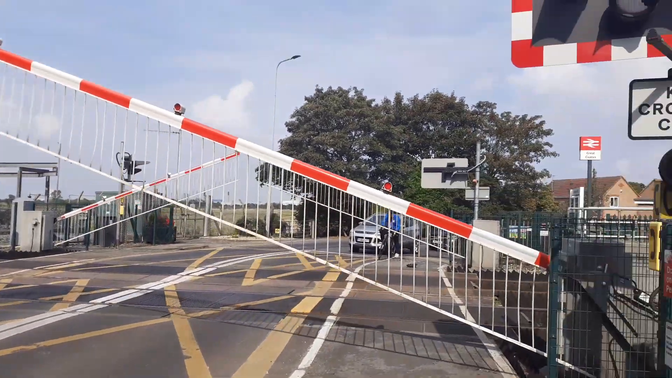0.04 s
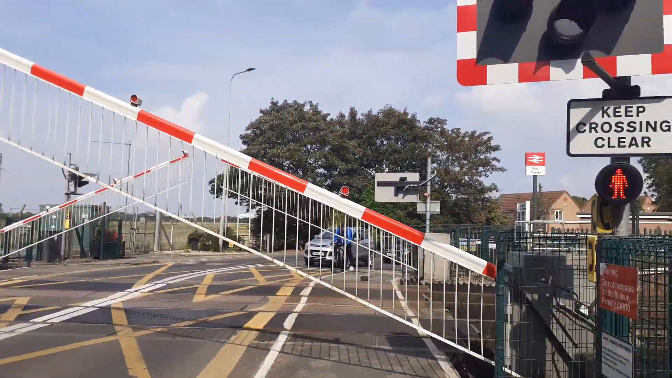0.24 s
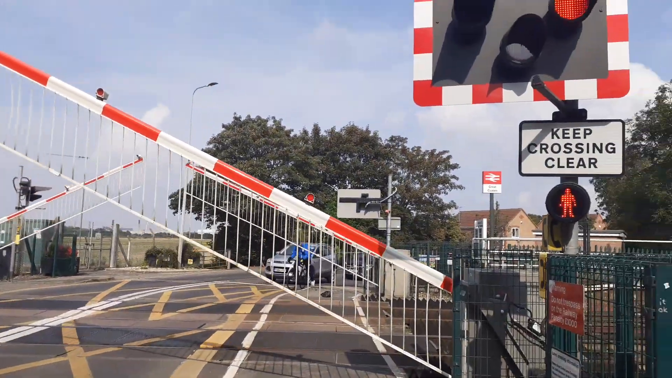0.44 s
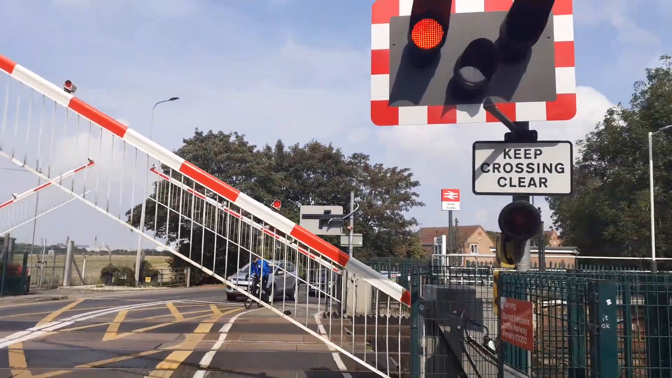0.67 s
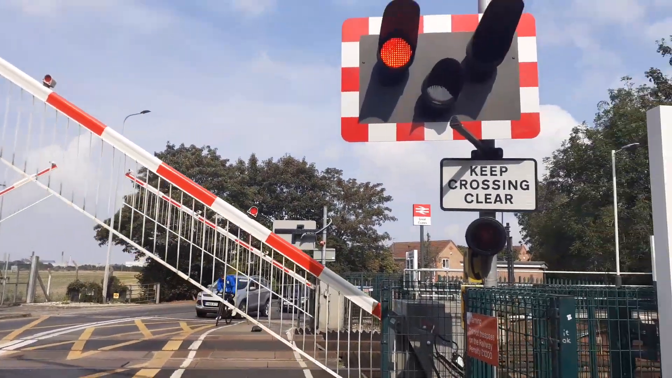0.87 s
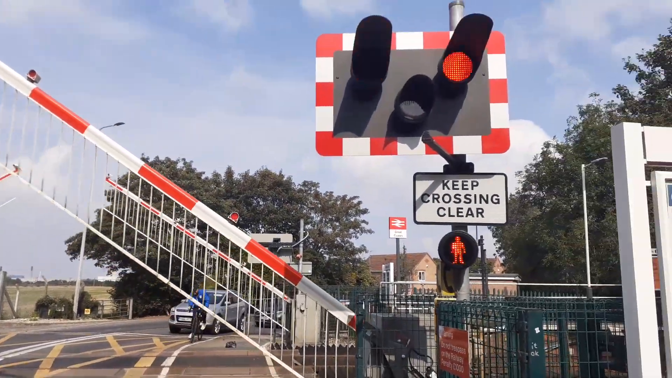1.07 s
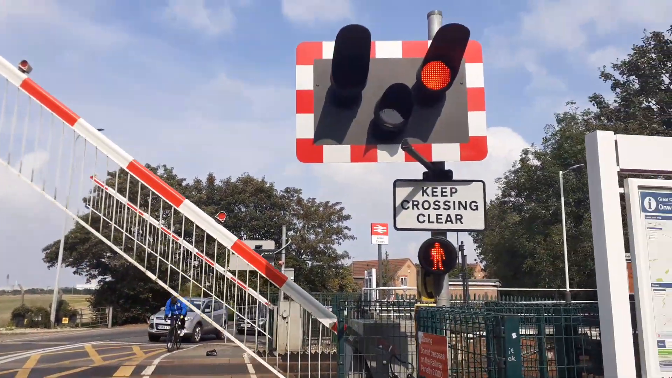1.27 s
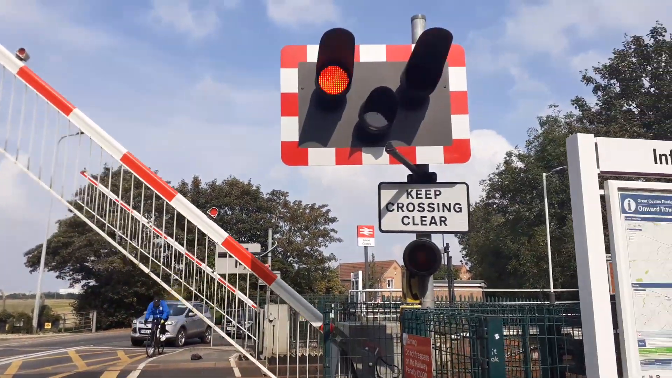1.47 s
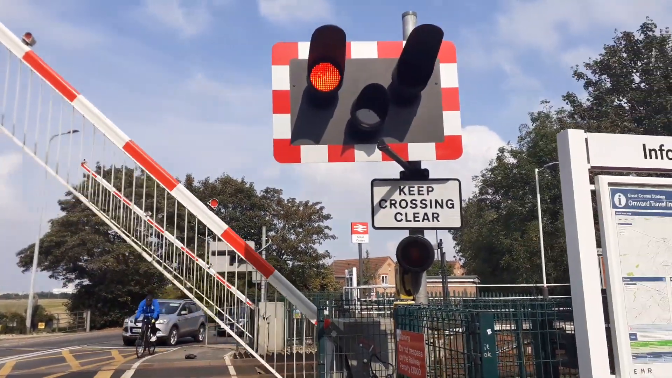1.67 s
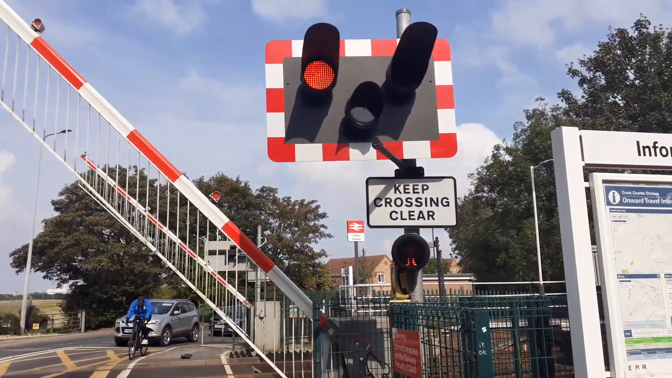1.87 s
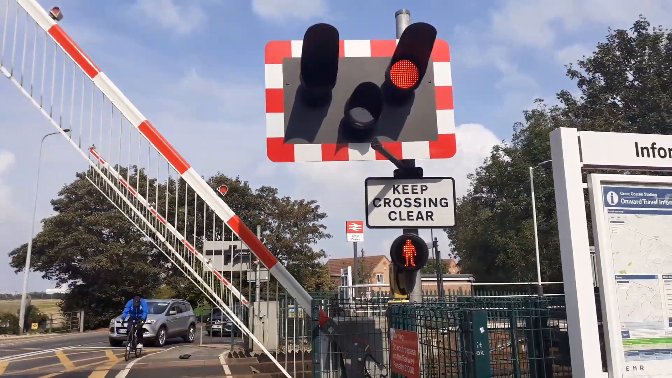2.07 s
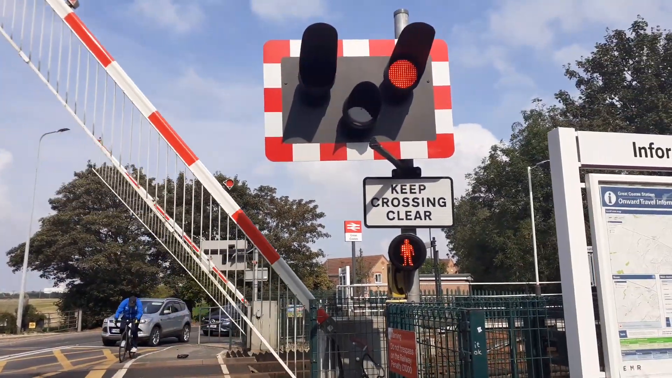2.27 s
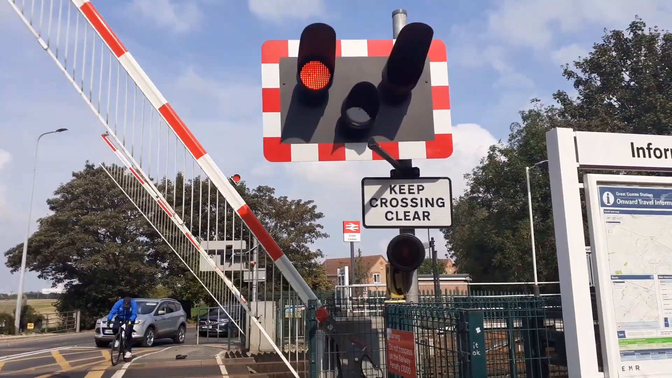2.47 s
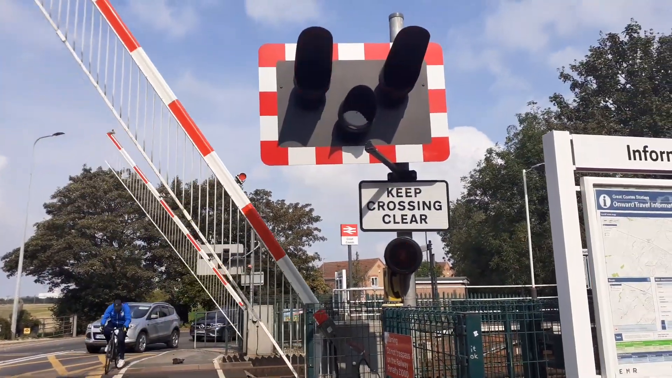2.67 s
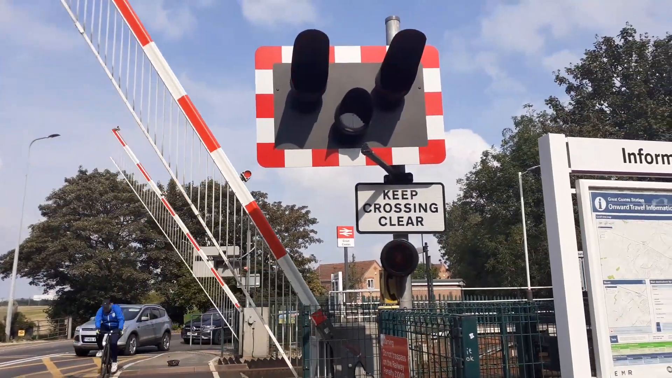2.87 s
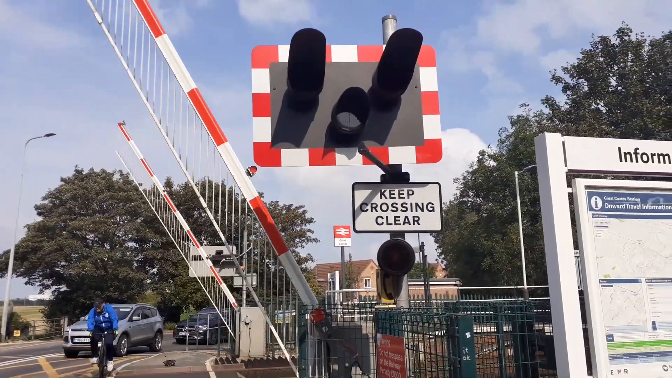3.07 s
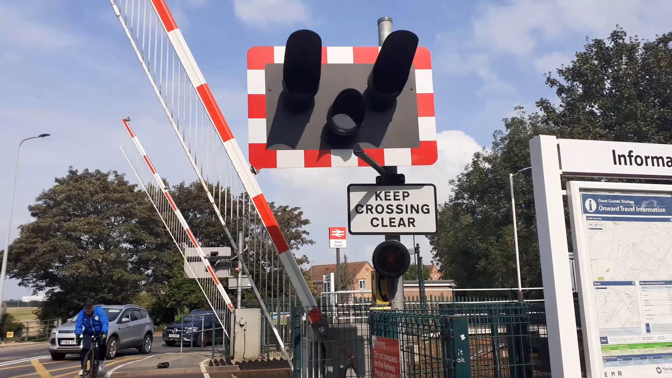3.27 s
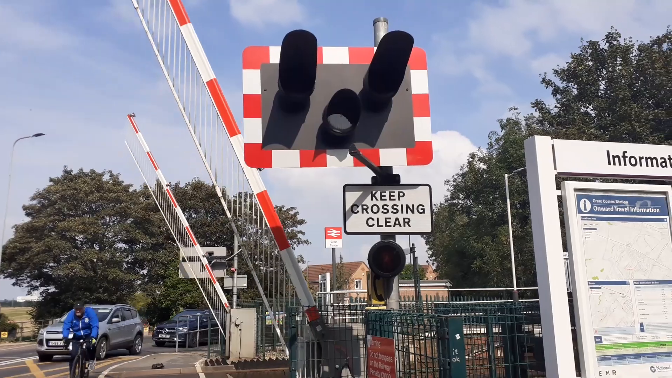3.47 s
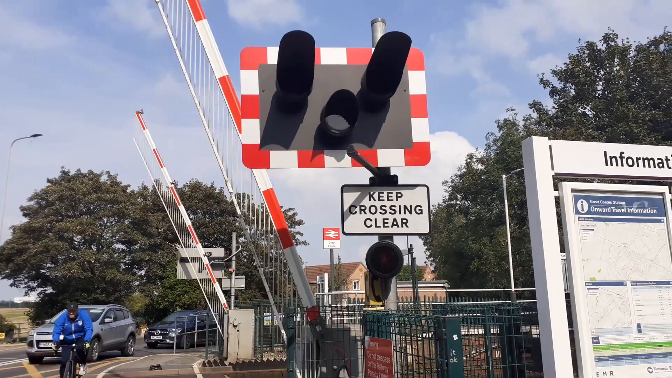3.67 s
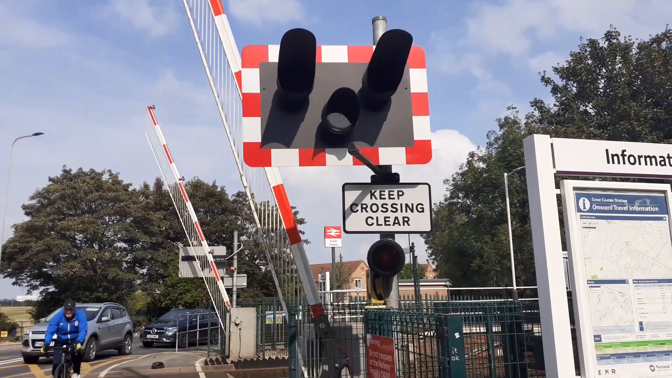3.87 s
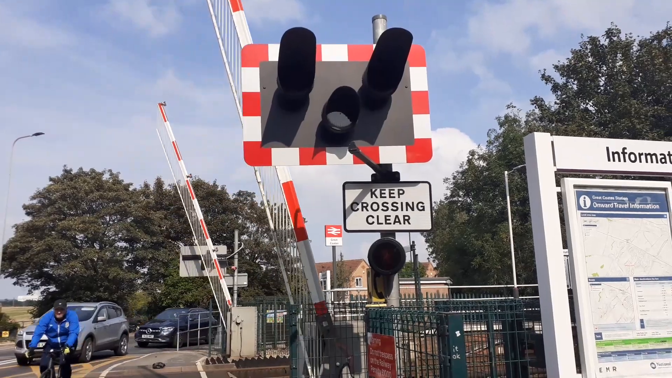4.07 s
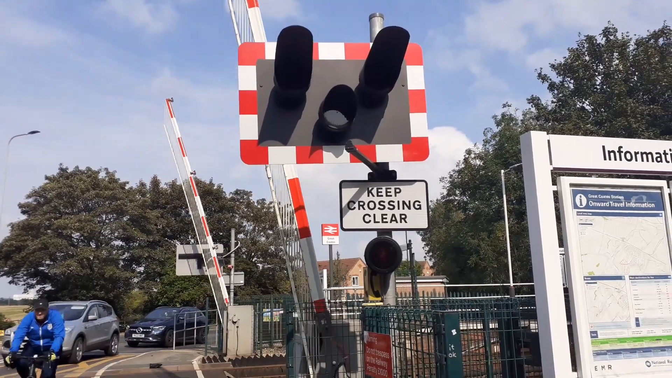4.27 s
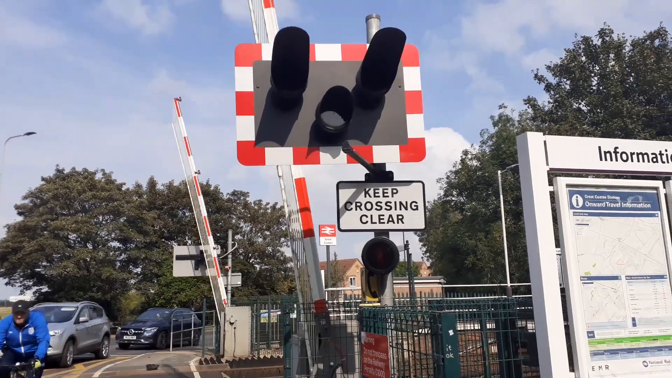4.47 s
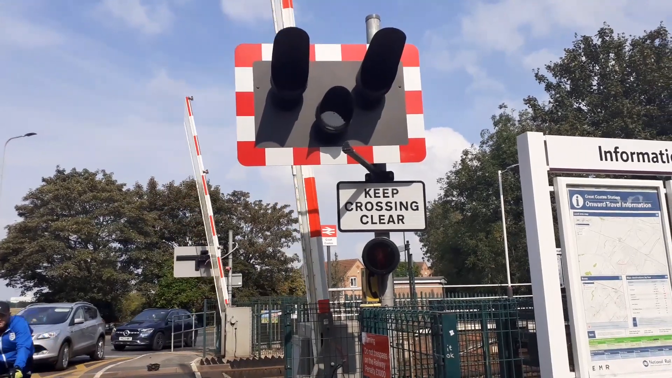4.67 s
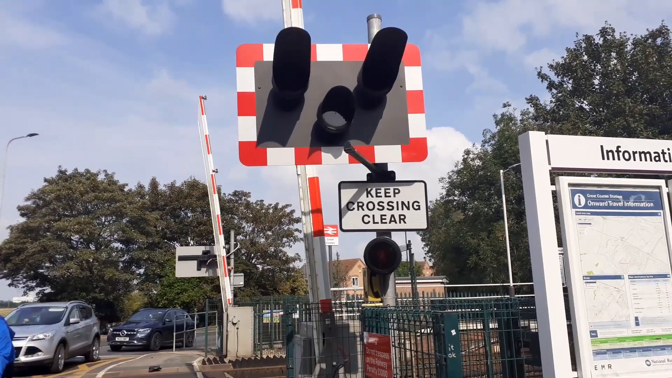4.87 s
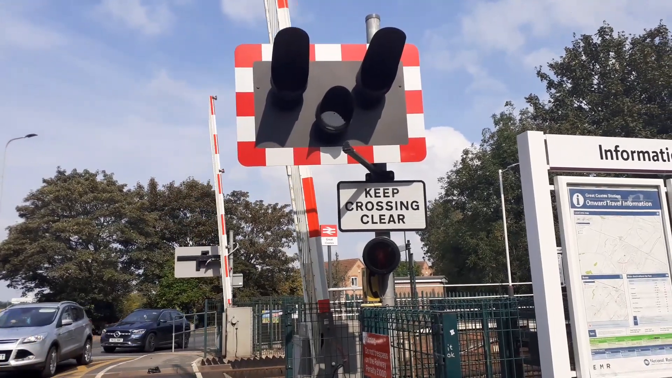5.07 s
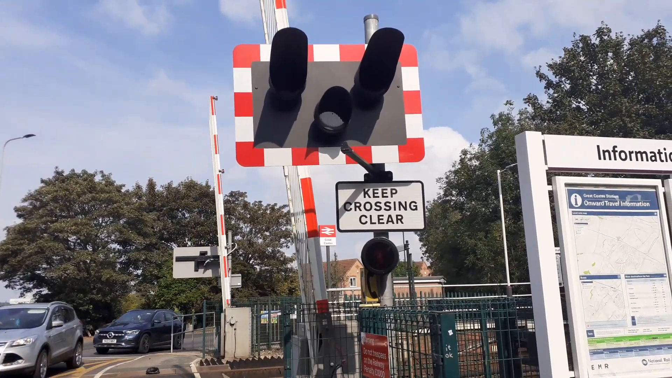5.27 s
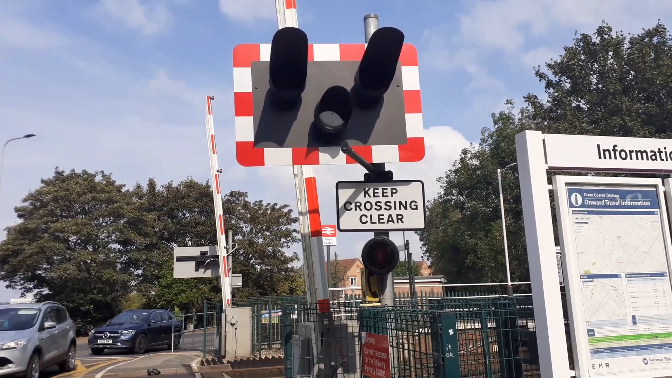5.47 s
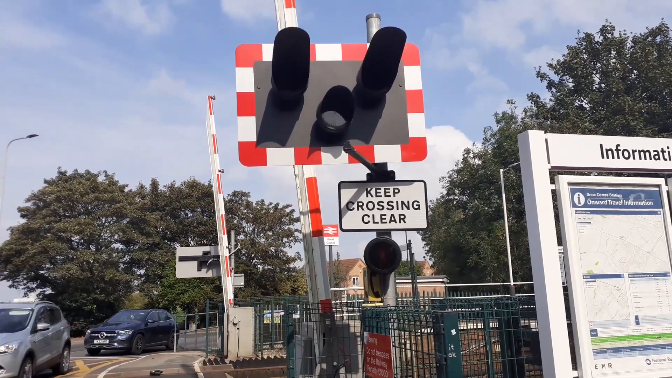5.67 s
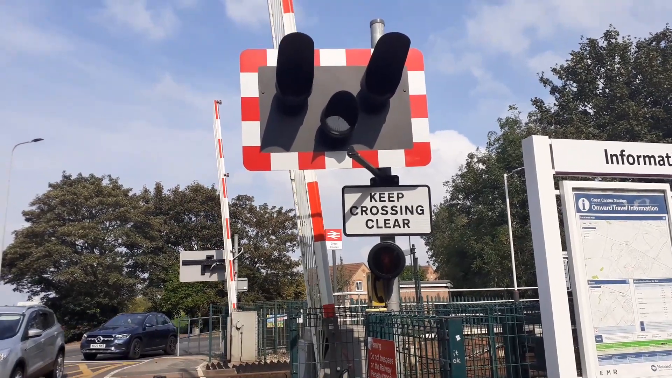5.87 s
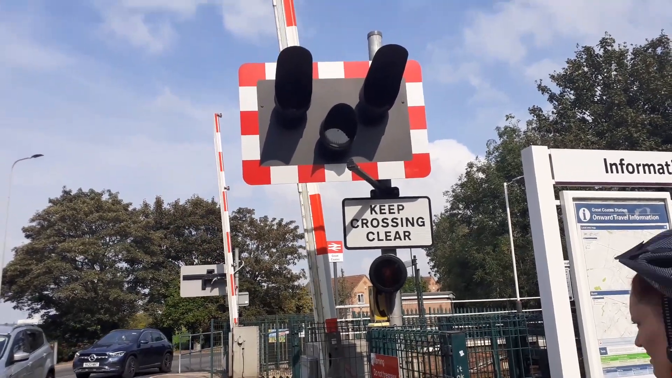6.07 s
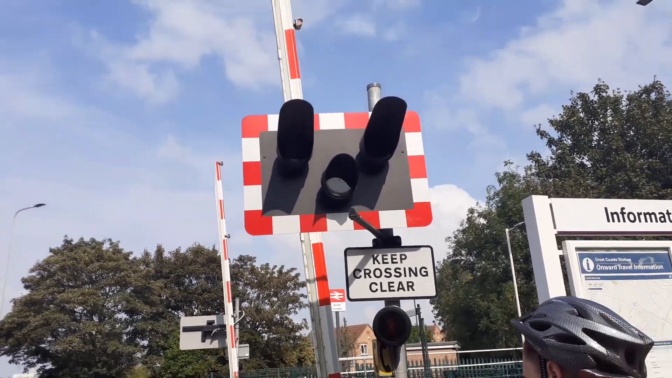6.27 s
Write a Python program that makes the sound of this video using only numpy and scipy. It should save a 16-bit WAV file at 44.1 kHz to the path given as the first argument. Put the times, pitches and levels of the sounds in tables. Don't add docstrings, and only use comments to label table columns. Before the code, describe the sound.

Close outdoors at a level crossing, four slightly out-of-tune barrier pumps hum and beat, sagging gently in pitch. On the left a car pulls away with low engine tones, tyre hiss and faint whirrs, while wind puffs at the stereo microphones. After almost five seconds the hum drops out and coasts down; the boom knocks woodenly, its metal skirt ticks and scrapes, the hollow cabinet drums, and traffic swells nearer.

```python
import sys
import numpy as np
from scipy import signal
from scipy.io import wavfile
from scipy.ndimage import map_coordinates

SR = 44100
rng = np.random.default_rng(int(sys.argv[2]) if len(sys.argv) > 2 else 0)


def boost_factor(decibels):
    exponent = np.asarray(decibels, float) / 20
    return 10 ** exponent


def dump_mix(stems):
    frames = np.atleast_2d(stems).T
    limited = np.clip(frames, -1, 1)
    pcm = np.round(limited * 32767).astype(np.int16)
    wavfile.write(sys.argv[1], SR, pcm)


N = 278752

# (time [s], pitch 1 [Hz], pitch 2 [Hz], pitch of pump 3 [Hz], pitch 4 [Hz])
PUMP_PITCH = [(0.0, 352.55, 345.39, 341.93, 353.4), (0.4, 353.33, 344.88, 338.69, 343.13),
              (0.79, 352.49, 342.86, 337.44, 347.34), (1.18, 351.0, 343.03, 336.22, 345.96),
              (1.58, 349.41, 341.78, 334.51, 341.11), (1.98, 348.42, 340.45, 335.19, 344.85),
              (2.37, 346.2, 339.49, 332.44, 341.56), (2.76, 345.13, 339.58, 331.15, 343.91),
              (3.16, 344.34, 339.99, 331.15, 339.66), (3.56, 341.77, 338.66, 330.7, 342.43),
              (3.95, 342.91, 337.75, 329.49, 342.69), (4.35, 337.07, 337.0, 329.01, 337.95),
              (4.74, 333.03, 335.05, 329.06, 330.45)]
# (time [s], level 1 [dB], level 2 [dB], level 3 [dB], level 4 [dB])
PUMP_LEVEL = [(0.0, -42.3, -21.1, -32.3, -44.2), (0.4, -44.7, -25.9, -36.5, -20.1),
              (0.79, -34.0, -18.2, -29.4, -35.2), (1.18, -34.4, -18.2, -31.9, -54.4),
              (1.58, -30.7, -18.6, -38.3, -16.9), (1.98, -33.7, -22.4, -28.3, -32.8),
              (2.37, -32.8, -19.9, -35.1, -42.1), (2.76, -38.0, -20.4, -31.8, -46.9),
              (3.16, -40.8, -23.8, -36.0, -32.7), (3.56, -32.6, -23.5, -35.6, -30.2),
              (3.95, -25.2, -21.2, -40.8, -25.1), (4.35, -21.2, -16.0, -35.5, -24.6),
              (4.74, -22.3, -21.0, -28.4, -21.1)]
# (time [s], left minus right [dB])
PUMP_SIDE = [
    (0, 1.5),
    (.8, -2.5),
    (2.4, -1),
    (3.2, -3.5),
    (4.7, -1.5),
]
STOP_S = 4.715
CUT_DB, CUT_S = -9.5, 0.026
COAST_DB_PER_S, COAST_HZ_PER_S = -53, -16.5
FOURTH_DB, THIRD_DB, SHAFT_DB_PER_S = -40.5, -45, -1.7

# (time [s], level of its lowest tone [dB])
FAR_LEVEL = [(0, -55), (2.6, -55), (3.05, -40.5), (3.55, -39), (3.75, -50), (4.0, -43), (4.65, -47),
             (4.85, -37), (5.2, -36), (5.33, -33), (5.48, -38.5), (5.55, -39), (5.61, -38), (5.68, -29),
             (5.76, -36), (6.32, -38)]
FAR_HZ, FAR_SAG_HZ_PER_S, FAR_START_S, FAR_UPPER_DB = 382, -1.2, 2.6, -61

# (time [s], firing pitch [Hz], second order [dB], first order [dB], third order [dB])
ENGINE = [(0.0, 56.5, -43, -42, -55), (0.45, 52, -50, -52, -60), (0.6, 53, -35.5, -51, -56),
          (0.75, 57.9, -32.5, -44, -56), (0.92, 64.5, -42, -41, -55), (1.15, 68.5, -52, -58, -58),
          (1.45, 69.82, -51, -41.5, -58), (1.7, 67.01, -53, -54, -58), (1.9, 63.5, -42, -46, -56),
          (2.2, 64.2, -40.5, -42, -55), (2.83, 65.3, -42, -49, -50), (3.05, 58.5, -42, -49, -48),
          (3.5, 59.6, -42, -43, -44), (3.83, 65.5, -40.5, -45, -49), (3.95, 59.9, -59, -49, -51),
          (4.37, 50.6, -42, -43, -56), (4.6, 53.07, -39, -53, -56), (4.8, 45.8, -48, -45, -53),
          (5.37, 54.8, -39.5, -41, -43), (6.2, 57, -40, -39, -47), (6.32, 59.5, -33, -33, -48)]
GEAR_ON_S, GEAR_OFF_S = 0.6, 3.1
GEAR_DB, GEAR_FADE_DB_PER_S, GEAR_IDLE_DB = -53, 45, -70

# (time [s], nearness of traffic [dB], rush of tyres and oil [dB])
ROAD_DRIVE = [(0, 2.5, -9), (.17, 0.5, -7), (.4, 0, -3), (.76, 0.5, 2), (1.14, 0.5, 3), (2.06, -0.5, 1.5),
              (2.82, 0.5, 1.5), (3.61, 0.5, 0), (3.86, 0.5, 2.5), (4.47, 3, -3), (4.75, 6, -4.5),
              (4.91, 3, 0.5), (5.23, 2, 1.5), (5.42, 6.5, -2), (5.86, 7.5, -1.5), (6.18, 11, -4.5),
              (6.32, 11, -4)]
# (frequency [Hz], level per Hz [dB])
ROAD_COLOUR = [(30, -38), (50, -12.5), (110, -9), (200, -9.5), (300, -1), (450, -9), (600, -11.5),
               (850, -5), (1050, -10.5),
               (1300, -13.5), (2200, -20), (3500, -25), (8000, -33), (10000, -14.5), (13000, -18)]
# (frequency [Hz], share of power [0-1])
FROM_LEFT = [(50, .8), (300, .75), (700, .55), (1300, .45), (3000, .4), (8000, .48), (11000, .24)]
# (time [s], lead of the left microphone [samples], weight of direct share [factor])
BEARING = [
    (0, 24.2, 0.78),
    (.5, 19.9, 1.18),
    (2.5, 19.5, 0.85),
    (3.2, 20.66, 0.85),
    (4, 21, 0.83),
    (4.7, 22, 0.62),
    (5.5, 22.5, 0.73),
    (6.32, 25.3, 0.41),
]
# (level [dB], share of nearness [factor], share of rush [factor])
ROAD_LAYERS = [
    (-41, 1, 0.054),
    (-34.5, 0.55, 0.14),
    (-41.5, 0.84, 0.75),
    (-52.5, .05, 0.88),
]
LEFT_LEAD = 21

DRUM_DB, DRUM_FOLLOWS = -45.5, 1.1
SETTLE_DB, SETTLE_DB_PER_S = -36, -13

# (time [s], length [s], left level [dB], right level [dB], pitch [Hz])
PUFFS = [(0.05, 0.058, -56, -30.5, 84), (0.553, 0.07, -49, -36, 90.7), (0.712, 0.018, -32, -30, 105),
         (0.907, 0.21, -39, -45, 80), (1.88, 0.21, -36.5, -57, 90), (2.183, 0.064, -55, -36.5, 88.1),
         (4.32, 0.027, -61, -25, 107), (4.48, 0.066, -53, -27, 105), (4.63, 0.066, -50, -37, 90.3),
         (5.001, 0.035, -45, -38, 90), (5.604, 0.087, -37, -51, 80.4), (5.9, 0.006, -27, -35, 106),
         (6.197, 0.042, -36, -45.5, 80.1)]

# (loudest time [s], length [s], pitch there [Hz], level [dB],
# sag in pitch [share per s])
WHIRRS = [(1.5, .45, 770, -43.5, .02), (2.7, .6, 850, -46, .0), (.9, .35, 1960, -48, 0.),
          (2.1, .45, 1960, -50, .02), (1.6, .5, 2400, -52, .03), (2.9, .5, 2150, -53, -.03),
          (3.9, .35, 2230, -50, 0.), (1.2, .45, 4250, -57, .02), (3.15, .45, 4000, -53, .03),
          (3.65, .2, 3700, -54, .1), (4.35, .3, 3250, -54, .1), (6.15, .3, 1460, -44, 0.),
          (6.15, .25, 520, -42, 0.), (1.6, .7, 6800, -60, .04), (1.0, .4, 8500, -63, 0.),
          (3.3, .8, 8300, -62, .015), (1.5, .5, 13900, -66, -.04), (1.4, .5, 11800, -67, 0.),
          (.6, .35, 3900, -59, 0.)]
WHIRR_WIDTH_HZ, WHIRR_WIDENS = 70, 0.012
# (time [s], pitch [Hz], level [dB])
IDLER = [
    (3.75, 148, -70),
    (3.98, 155, -44),
    (4.45, 156, -42),
    (4.72, 165, -44),
    (5.05, 168, -70),
]

# (time [s], top band peak [dB], high band [dB], mid band [dB])
SLATS = [(4.7185, -25, -2, -5), (4.786, -40, -5, 4), (4.7925, -25, -15, -8), (5.048, -33, -9, -6),
         (5.142, -30.5, -1, -5), (5.152, -28.5, 1, -1), (5.173, -38, -6, -3), (5.1644, -37, -13, -1),
         (5.261, -34, 1, -4), (5.324, -24, -6.5, -7.5), (5.421, -34, -6, 1), (5.442, -35, -1, -7),
         (5.457, -36, -10, 1), (5.589, -32, -3, -9), (5.600, -30, -1, -14), (5.681, -28.5, -4, -12),
         (5.774, -29.5, -5.5, -20), (5.866, -29.5, -3, -3), (5.965, -33.5, 5, 3), (6.047, -36.5, 4, 5),
         (6.0671, -35, -18, -5), (6.08, -35, -14, -7), (6.312, -38, -3, -8)]
# (time [s], top band peak [dB], high band [dB], mid band [dB])
TICKS = [(1.1794, -39, 5, 8), (1.796, -35.5, 4, 6.5), (4.138, -36.5, -4, 8.5), (4.7775, -35, -15, -5),
         (4.916, -41, -18, 14), (4.938, -25.5, -4, -14), (5.0998, -33, -5, 2), (5.18, -36, -1, 0),
         (5.245, -29, -14, -9), (5.365, -39, -11, 1), (5.5, -44, -6, -2), (5.73, -41, 11, -6),
         (5.755, -42, -15, -12), (5.815, -48, -6, 1), (5.841, -42, -7, 8), (5.8934, -40, 8, 14.5),
         (5.907, -38, -6, 0), (6.1469, -36, -14, -11), (6.1705, -41, -16, -12), (6.24, -38, -4, 9),
         (6.2642, -30.5, -13, 1)]
# (time [s], top band peak [dB], left minus right [dB], lower bands [dB], length [s])
LATCH = [(4.8345, -27, 2, -11, .003), (4.8452, -34, 5, 5, .004), (4.8488, -19, 7, -8, .004),
         (4.855, -28, 1, -8, .02), (5.6105, -28, -5, 3, .002), (5.6125, -34, -4, 2, .007),
         (5.6236, -26, -7, 6, .002), (5.6255, -34, -5, 1, .007), (5.592, -42, -2, 7, .016),
         (5.684, -42, -2, 7, .01), (5.632, -37, -4, 1, .012), (6.14, -37, 2, -22, .045)]
# (frequency [Hz], width [Hz], level [dB])
SLAT_RINGS = [
    [(11660, 1900, -3), (13240, 2300, -6), (14900, 1800, -7)],
    [(7370, 2700, 1.5), (5600, 3100, -2)],
    [(2060, 2100, 7), (3440, 3840, 2.5)],
]
# (time [s], level [dB])
SHIVER = [
    (4.722, -40),
    (4.846, -69),
    (5.03, -52),
    (5.145, -47),
    (5.59, -63),
    (5.96, -60),
]
# (time [s], level [dB], left minus right [dB])
SNAP = [
    (4.8496, -2, 9),
    (4.8503, 8, 9),
    (4.8521, -1, 9),
    (4.8526, -2, 9),
]
SCRAPE_S, TICK_S, SHIVER_S = 0.0095, 0.0022, 0.093
SKIRT_SIDE_DB, DULL_CENTRES = 10.5, 0.4
SLAT_VARIES_DB = 2.5
SKIRT_LEAD = 2

# (time [s], peak [dB], pitch [Hz], left minus right [dB])
THUDS = [
    (2.529, -24, 172.5, 16),
    (2.536, -26, 105, 15),
    (2.598, -29, 120, 12),
    (5.884, -24.5, 85, 2),
]

# (time [s], peak [dB], pitch [Hz])
KNOCKS = [(4.744, -18, 345), (4.756, -9.5, 333.5), (4.766, -28, 330), (4.817, -27, 312), (4.838, -25, 330),
          (4.848, -17, 347), (4.89, -35, 332), (4.909, -18, 311), (5.041, -23, 331), (5.074, -11.5, 349),
          (5.167, -18, 317), (5.248, -18, 338), (5.265, -16.5, 352), (5.415, -24, 338), (5.532, -14.5, 344),
          (5.551, -15.5, 340), (5.565, -17.5, 324), (5.747, -38, 359), (5.821, -15.5, 345),
          (5.839, -14, 353), (5.857, -26, 366), (5.882, -6, 325), (5.899, -11, 343), (5.914, -17, 343.5),
          (5.933, -10, 329), (5.967, -17, 316), (6.028, -16, 317.4), (6.042, -11.5, 328),
          (6.059, -11, 324.6), (6.077, -15, 255.5), (6.104, -12, 370), (6.119, -13.5, 346),
          (6.146, -28, 332), (6.213, -16.5, 290.5), (6.267, -16, 266.3), (6.289, -13, 317.5),
          (6.308, -15.5, 319.5)]
# (time [s], peak [dB], pitch [Hz], time to build [cycles])
TAPS = [(4.7195, -31, 4000, 6), (4.72, -31, 2100, 4), (4.7245, -26.5, 2480, 6), (4.757, -27, 570, 3),
        (4.793, -32, 3400, 9), (4.803, -38, 3000, 22), (4.8545, -31, 4000, 9), (4.745, -19.5, 480, 5),
        (5.626, -30, 3020, 20), (5.638, -27, 900, 2), (6.065, -44, 5000, 40), (6.0905, -15, 830, 1.5),
        (4.8455, -22, 3500, 2.5), (4.846, -26, 5200, 3), (4.849, -25, 1900, 2.5), (4.812, -36, 3200, 25),
        (4.755, -22, 240, 4), (5.075, -27, 326, 9), (5.15, -23, 330, 8)]


def rms_one(x):
    return x / np.sqrt(np.mean(x ** 2) + 1e-20)


def in_time(rows):
    times, *columns = np.transpose(rows)
    return [np.interp(np.arange(N) / SR, times, column) for column in columns]


def at_hz(points, hz):
    table = np.array(points)
    return np.interp(np.log(hz), np.log(table[:, 0]), table[:, 1])


def drift(rate):
    r = np.exp(-80 * np.pi * rate / SR)
    noise = rng.standard_normal(N // 40 + 2002)
    slow = signal.lfilter([1], [1, -2 * r, r * r], noise)[2000:]
    return np.interp(np.arange(N) / 40, np.arange(len(slow)), rms_one(slow - slow.mean()))


def resonance(x, hz, width_hz):
    r = np.exp(-np.pi * width_hz / SR)
    push = np.array([1, 0, -1]) * (1 - r * r) / 2
    ring = [1, -2 * r * np.cos(2 * np.pi * hz / SR), r * r]
    return signal.lfilter(push, ring, x + 1e-18)


def tone(hz, rms_db):
    turns = np.cumsum(hz) / SR + rng.random()
    return np.sqrt(2) * boost_factor(rms_db) * np.sin(2 * np.pi * turns)


def panned(x, pan_db, lead=0):
    left = x * boost_factor(pan_db / 2)
    right = np.roll(x, lead) * boost_factor(-pan_db / 2)
    return np.array([left, right])


def delayed(x, samples):
    places = [np.arange(N) - samples]
    return np.array([map_coordinates(row, places, order=3, mode="mirror") for row in x])


def pump():
    t = np.arange(N) / SR
    after = np.maximum(t - STOP_S, 0)
    hz = np.array(in_time(PUMP_PITCH)) + COAST_HZ_PER_S * after
    power_off_db = CUT_DB * np.minimum(after / CUT_S, 1) + COAST_DB_PER_S * after
    db = np.array(in_time(PUMP_LEVEL)) + power_off_db
    phase = 2 * np.pi * np.cumsum(hz + 0.82 * drift(28), axis=1) / SR
    flutter = boost_factor(-0.04 + 0.5 * drift(35))
    teeth = np.sqrt(2) * flutter * np.sum(boost_factor(db) * np.sin(phase), axis=0)
    fade_db = SHAFT_DB_PER_S * t - 300 * after
    fourth = tone(hz[1] * 4 / 5, FOURTH_DB + fade_db + 1.2 * drift(4))
    third = tone(hz[1] * 3 / 5, THIRD_DB + fade_db * 2 + 1.2 * drift(4))
    side_db = in_time(PUMP_SIDE)[0] + 1.2 * drift(13)
    return panned(teeth, side_db) + fourth + third


def far_motor():
    since = np.arange(N) / SR - FAR_START_S
    hz = FAR_HZ + FAR_SAG_HZ_PER_S * np.maximum(since, 0)
    upper_db = FAR_UPPER_DB + 6 * np.minimum(since - 0.5, 0)
    out = np.zeros((2, N))
    for k, db in enumerate(in_time(FAR_LEVEL) + [upper_db, upper_db]):
        whine = tone(hz * (k + 1), db + 1.8 * drift(5))
        out += panned(whine, 1.5, lead=LEFT_LEAD * k)
    return out


def engine():
    hz, second_db, first_db, third_db = in_time(ENGINE)
    t = np.arange(N) / SR
    hz = hz * (1 + 0.004 * drift(6.7))
    low = np.zeros(N)
    for k, db in enumerate((first_db, second_db, third_db)):
        waver_db = 3.5 if k == 0 else 1.5
        low += tone(hz * (k + 1), db + waver_db * drift(6))
    outside_s = np.maximum(np.maximum(GEAR_ON_S - t, t - GEAR_OFF_S), 0)
    gear_db = np.maximum(GEAR_DB - GEAR_FADE_DB_PER_S * outside_s, GEAR_IDLE_DB) + 3.5 * drift(10)
    gear = tone(hz * 11 + 4 * drift(20), gear_db) + tone(hz * 12, gear_db - 5)
    return panned(low + gear, 0.0, lead=LEFT_LEAD)


def road():
    near_db, rush_db = in_time(ROAD_DRIVE)
    lead, weight = in_time(BEARING)
    white = rng.standard_normal((2, 3, N))
    direct, diffuse = np.zeros((4, N)), np.zeros((4, 2, N))
    together = drift(7)
    edges = 28 * 2 ** np.arange(0, 9.3, 0.4)
    for k, (low, high) in enumerate(zip(edges, edges[1:])):
        band_filter = signal.butter(2, [low, high], "band", fs=SR, output="sos")
        bands = signal.sosfilt(band_filter, white[k % 2])
        hz = np.sqrt(low * high)
        share = np.clip(at_hz(FROM_LEFT, hz) * (weight if hz > 500 else 1), 0, 1)
        colour_db = at_hz(ROAD_COLOUR, hz)
        gain = boost_factor(colour_db + 0.5 * together + 0.95 * drift(22))
        layer = np.searchsorted([230, 1500, 9000], hz)
        direct[layer] += gain * np.sqrt(share) * bands[0]
        diffuse[layer] += gain * np.sqrt(1 - share) * bands[1:]
    direct = direct + 0.25 * weight * delayed(direct, lead)
    layers = diffuse + np.stack([direct, delayed(direct, lead)], axis=1)
    out = np.zeros((2, N))
    for (db, near, rush), layer in zip(ROAD_LAYERS, layers):
        out += boost_factor(db + near * near_db + rush * rush_db) * rms_one(layer)
    return out


def cabinet():
    white = rng.standard_normal((3, N))
    shaken = white[0] + 0.38 * white[1:]
    drumming = resonance(resonance(shaken, 311, 152), 311, 152)
    after = np.arange(N) / SR - STOP_S
    traffic = boost_factor(DRUM_DB + DRUM_FOLLOWS * in_time(ROAD_DRIVE)[0])
    landing = (after > 0) * boost_factor(SETTLE_DB + SETTLE_DB_PER_S * after)
    return rms_one(drumming) * (traffic + landing) * boost_factor(2.1 * drift(40)) * boost_factor([[-1.2], [1.2]])


def wind():
    out, t = np.zeros((2, N)), np.arange(N) / SR
    white = rng.standard_normal((2, N)) * boost_factor([2.0 * drift(33), 2.5 * drift(31)])
    for s, length, left_db, right_db, hz in PUFFS:
        near = slice(max(0, int((s - 0.4) * SR)), int((s + 0.4) * SR))
        swell = np.exp(-0.5 * ((t[near] - s) / length) ** 2)
        lumps = swell * resonance(resonance(white[:, near], hz, 0.26 * hz), hz, 2.4 * hz)
        lumps = lumps * np.sqrt(np.sum(swell ** 2) / np.sum(lumps ** 2, axis=1, keepdims=True))
        out[:, near] += lumps * boost_factor([[left_db], [right_db]])
    return out


def whirr():
    t = np.arange(N) / SR
    out = np.zeros(N)
    for s, length, hz, db, sag in WHIRRS:
        swell = np.exp(-0.5 * ((t - s) / length) ** 2)
        roughness = drift(min(WHIRR_WIDTH_HZ + WHIRR_WIDENS * hz, 250))
        out += swell * roughness * tone(hz * (1 - sag * (t - s)), db)
    return panned(out + tone(*in_time(IDLER)), 1.2, lead=LEFT_LEAD)


def slats():
    drive, t = np.zeros((3, 2, N + SR)), np.arange(SR // 10) / SR
    touches = []
    for rows, length in ((SLATS, SCRAPE_S), (TICKS, TICK_S)):
        for s, db, high_db, mid_db in rows:
            touches.append((s, db, SKIRT_SIDE_DB - DULL_CENTRES * mid_db, high_db, mid_db, length))
    for s, db, pan_db, low_db, length in LATCH:
        touches.append((s, db, pan_db, low_db, low_db + 0.5, length))
    for s, peak_db, pan_db, high_db, mid_db, length in touches:
        contact = np.exp(-(t / max(length, 0.001)) ** 4)
        scrape = boost_factor(-13) * np.exp(-t / (3.5 * length))
        burst = boost_factor(peak_db - 9.5) * (contact + scrape) * np.minimum(t / (0.24 * length), 1)
        shadows_db = pan_db + 4.5, pan_db - 5.0, 0.25 * pan_db
        for band, db, shadow_db in zip(drive, (0, high_db, mid_db), shadows_db):
            band[:, round(s * SR):][:, :len(t)] += panned(boost_factor(db) * burst, shadow_db)

    swings = np.zeros(N)
    for s, db in SHIVER:
        since = np.maximum(np.arange(N) / SR - s, 0) / SHIVER_S
        swings += boost_factor(db) * since * np.exp(1 - since)
    shiver = panned(swings * boost_factor(-4.5 + 2.5 * drift(22)), 0.87)
    drive[:, :, :N] += shiver * boost_factor([-5, 1.5, -12])[:, None, None]

    snap = np.zeros((2, N))
    for s, db, pan_db in SNAP:
        snap[:, round(s * SR)] = boost_factor([db + pan_db / 2, db - pan_db / 2])

    grains_db = 2.17 * np.minimum(rng.exponential(1, N), 4) - 8.5
    grit = rng.standard_normal((3, N)) * boost_factor(grains_db)
    grit = 1.3 * grit[0] + 1.05 * grit[1:]
    hits = grit * drive[:, :, :N] + snap * boost_factor([0, -21, -26])[:, None, None]
    hits[:, 1] = np.roll(hits[:, 1], SKIRT_LEAD, axis=1)
    out = np.zeros((2, N))
    for band, rings in zip(hits, SLAT_RINGS):
        for hz, width, db in rings:
            struck = band * boost_factor(SLAT_VARIES_DB * drift(9))
            out += boost_factor(db + 7) * resonance(resonance(struck, hz, width), hz, 1.6 * width)
    return out


def thuds():
    out, t = np.zeros((2, N + SR)), np.arange(SR // 10) / SR
    for s, peak_db, hz, pan_db in THUDS:
        cycles = t * hz / 1.1
        swing = boost_factor(peak_db) * cycles * np.exp(1 - cycles) * np.sin(2 * np.pi * hz * t)
        out[:, round(s * SR):][:, :len(t)] += panned(swing, pan_db)
    return out[:, :N]


def knocks():
    out, t = np.zeros(N + SR), np.arange(SR // 10) / SR
    soft_knocks = [(*row, 1.5) for row in KNOCKS]
    for s, peak_db, hz, build in soft_knocks + TAPS:
        cycles = t * hz / build
        ring = cycles * np.exp(1 - cycles) * np.sin(2 * np.pi * hz * t)
        out[round(s * SR):][:len(t)] += boost_factor(peak_db - 6.0) * ring
    return panned(out[:N], -3.5)


def scene():
    machines = pump() + far_motor() + engine()
    surroundings = road() + cabinet() + wind() + whirr()
    return machines + surroundings + slats() + thuds() + knocks()


def band_limit(x):
    return signal.sosfilt(signal.butter(12, 16000, fs=SR, output="sos"), x)


def record(dry):
    dry = signal.sosfilt(signal.butter(2, 35, "high", fs=SR, output="sos"), dry)
    dry = dry - 0.5 * resonance(dry, 9220, 1020) - 0.29 * resonance(dry, 10400, 1640)
    dry = dry - 0.18 * resonance(dry, 3450, 600)
    dry = dry + np.array([[0.2], [-0.15]]) * resonance(dry, 12000, 12000)
    dry = signal.sosfilt(signal.cheby2(20, 70, 15950, fs=SR, output="sos"), dry)
    return band_limit(dry)


dry = scene()
out = record(dry)
dump_mix(out)
```